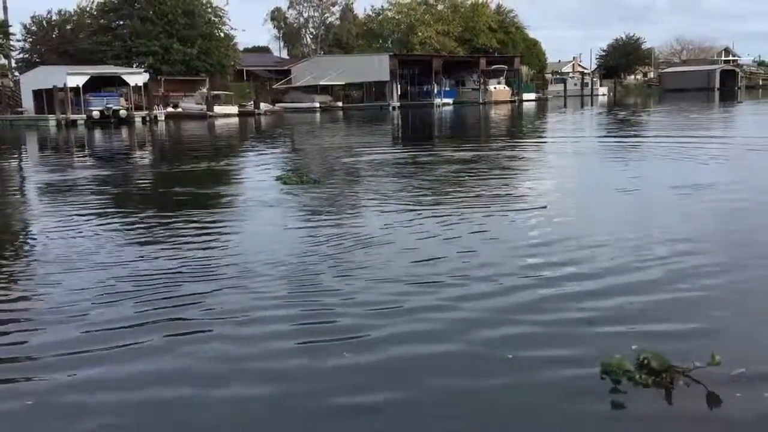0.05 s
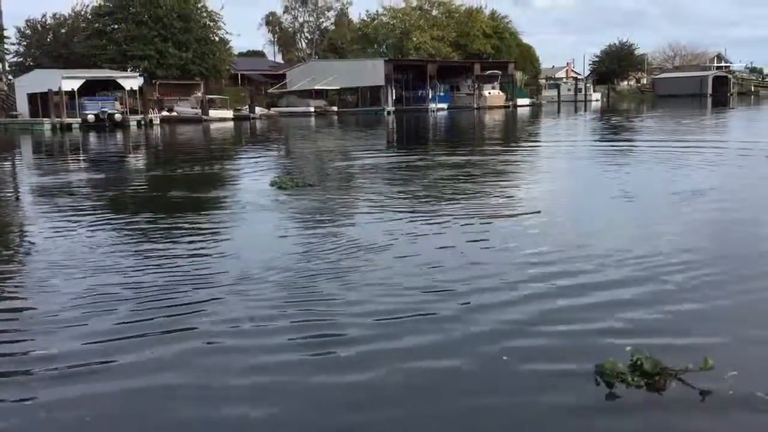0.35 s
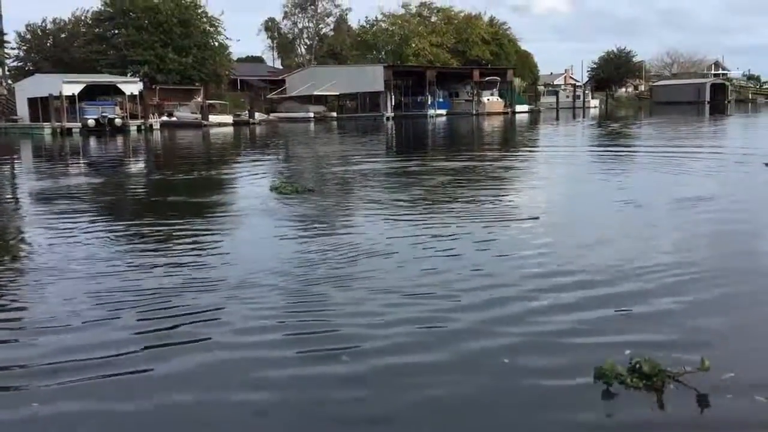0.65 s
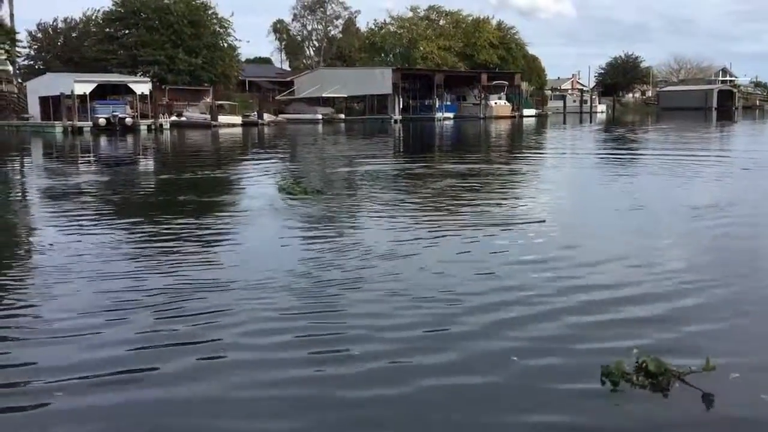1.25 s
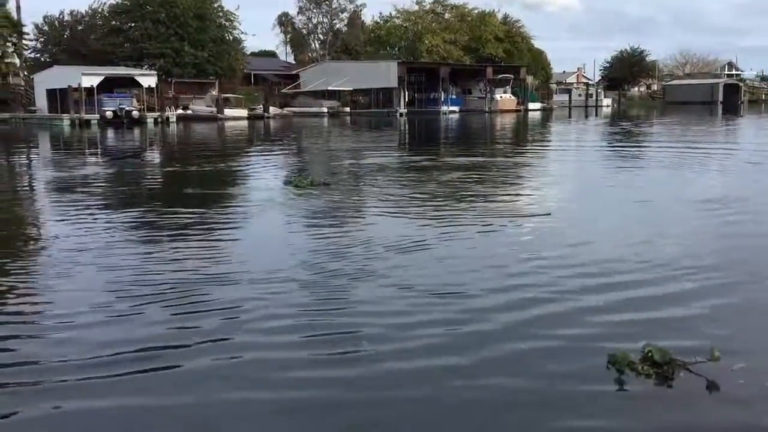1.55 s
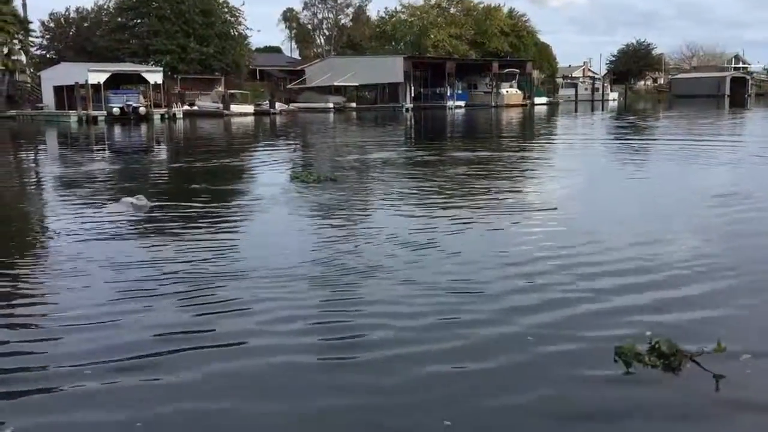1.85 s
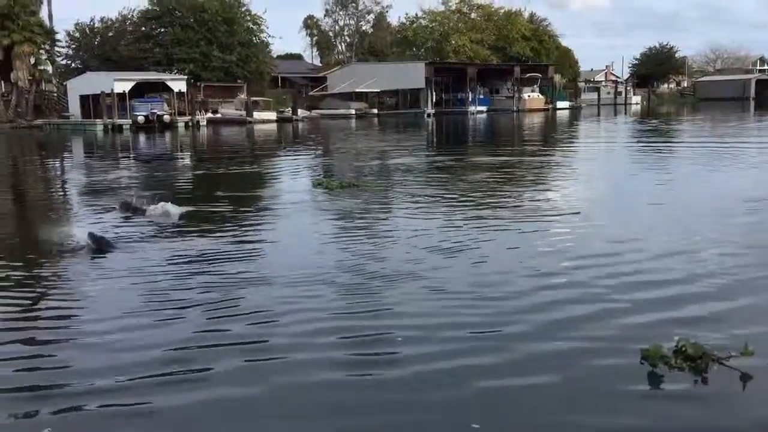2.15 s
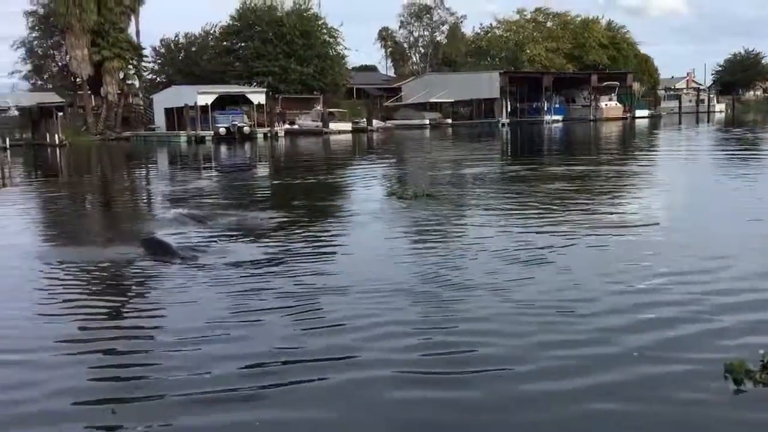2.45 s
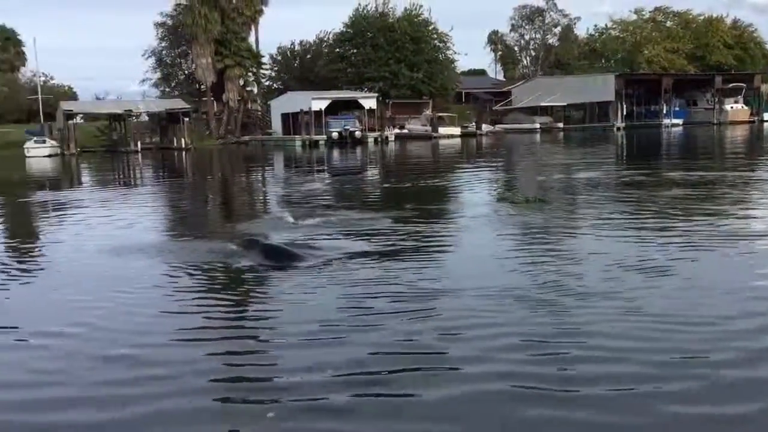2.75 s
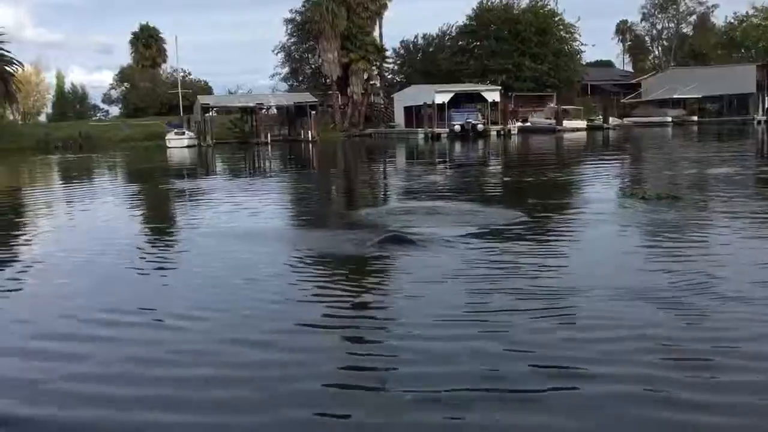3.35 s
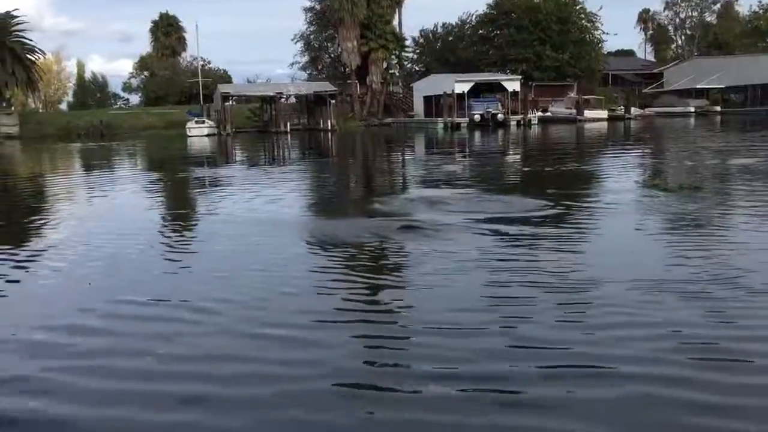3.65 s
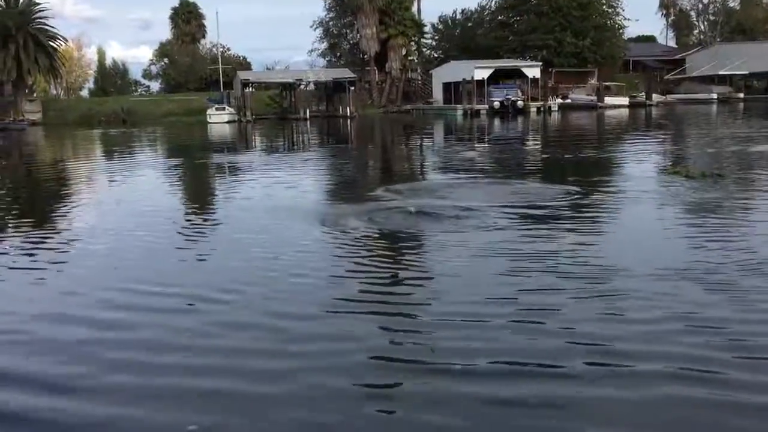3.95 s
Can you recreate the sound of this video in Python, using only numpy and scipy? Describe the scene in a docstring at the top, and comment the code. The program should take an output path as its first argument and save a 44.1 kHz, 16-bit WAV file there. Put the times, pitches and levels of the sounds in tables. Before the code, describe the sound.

Water splashes twice as a sea lion surfaces a few metres out on a quiet waterway, after two faint taps on wood. It rolls under with gurgles and trickles, then ripples plop near the microphone over a low, distant engine rumble.

```python
"""A sea lion surfaces some metres from the microphone on a calm waterway: two quick splashes and a weak
third, made of ringing bubbles and falling spray, then water gurgles and trickles round its body as it
rolls under. Ripples plop close to the bank. Before the splash come two faint wooden knocks and one
chirp of a far bird. Distant engines drone throughout, over a low rumble and a faint hiss."""
import sys
import numpy as np
from scipy import signal
from scipy.fft import rfft, irfft
from scipy.io import wavfile
from scipy.ndimage import map_coordinates

SR = 44100
rng = np.random.default_rng(int(sys.argv[2]) if len(sys.argv) > 2 else 0)


def store_wav(level_fs):
    """Save 16-bit WAV to argv[1]."""
    pcm = np.round(np.clip(np.atleast_2d(level_fs), -1, 1) * 32767)
    wavfile.write(sys.argv[1], SR, pcm.T.astype(np.int16))


N = 176400

# the animal breaking the surface
# (time [s], attack [s], hold [s], fall [dB/s], body level [dB], spray level [dB])
SPLASHES = [(2.046, 0.046, 0.059, 132, -40.5, -52.5), (2.2, .04, 0.05, 70, -41, -52),
            (2.366, 0.036, 0.041, 132, -54, -64.5)]
# churned water, spray and fine bubbles of a splash (frequency [Hz], level [dB])
CHURN_SPECTRUM = [(88, -15), (150, 14), (173, 2.5), (254, -2), (412, -2), (556, 2), (1010, -0.5), (1340, 0),
                  (1550, -3), (1860, -0.5), (2180, -7.5), (3110, -13), (3690, -26), (4500, -18.5),
                  (5850, -49), (9900, -120)]
SPRAY_SPECTRUM = [(2500, -0.5), (3800, -0.5), (4900, -3), (6000, -2), (9000, -5), (10500, -11),
                  (12500, -9.5), (16000, -11)]
FIZZ_SPECTRUM = [(1500, -25), (2000, -2.5), (2400, -6), (2750, -2), (3100, -5), (3700, -19)]
# water running round the body (time [s], gurgle level [dB], trickle level [dB])
WASH_LEVELS = [(2.3, -80, -81.5), (2.42, -69, -53.5), (2.58, -55.5, -55.5), (2.72, -49.5, -51.5),
               (2.84, -50.5, -49.5), (2.95, -53, -51.5), (3.04, -60.5, -56.5), (3.14, -92, -58.5),
               (3.22, -63, -59), (3.33, -101, -64.5), (3.42, -90, -76.5), (3.55, -97, -71.5),
               (3.75, -81.5, -74.5), (4.0, -70, -71.5)]
# big bubbles in the wake and run-off from the back (frequency [Hz], level [dB])
GURGLE_SPECTRUM = [(100, 25), (200, 3), (280, 5), (420, -0.5), (650, 5.5), (950, -0.5), (1600, -8)]
TRICKLE_SPECTRUM = [(400, 1), (750, -0.5), (1150, 2.5), (2000, 1), (2400, -3), (3300, -5), (4300, -7.5),
                    (4900, -7.5), (5600, -6.5), (8000, -16.5), (10500, -19.5), (15000, -25.5)]
# sheets of water dribbling off the back (time [s], level [dB], length [s])
DRIBBLES = [(2.973, -55.5, 0.024), (3.04, -56.5, 0.02), (3.058, -54, 0.034), (3.109, -59, 0.028),
            (3.17, -62, 0.019), (3.196, -50, 0.013), (3.25, -68, 0.04), (3.336, -67, 0.018),
            (3.484, -70, 0.053), (3.53, -57.5, 0.032), (3.967, -65, 0.061)]
# air pockets and drops that ring (time [s], pitch [Hz], peak level [dB], ring [s], glide [octaves/s])
PLOPS = [(.125, 1185, -70.5, 0.074, 4.5), (2.077, 975, -44, 0.18, -1.5), (2.092, 2140, -40.5, 0.03, -8.5),
         (2.114, 187, -36.5, 0.013, 3), (2.141, 737, -44.5, 0.085, 17), (2.167, 1770, -47, 0.056, 15),
         (2.238, 554, -44, 0.066, -3), (2.243, 202, -56, 0.08, 11), (2.253, 1840, -41, 0.11, 0.5),
         (2.294, 775.5, -55, .06, -5.5), (2.406, 1150, -39.5, 0.023, 2), (2.406, 290, -45.5, .04, -8),
         (2.52, 3330, -48, 0.0095, 11), (2.564, 3080, -49, 0.011, 11), (2.717, 630, -50, 0.078, 7),
         (2.74, 455, -47, 0.082, 2.5), (2.811, 233.4, -39.5, 0.02, -2), (3.369, 3210, -58.5, 0.02, 44),
         (3.5012, 3540, -48, 0.0039, -14), (3.504, 2214, -55, 0.012, 7), (3.51, 2650, -53, 0.013, 34),
         (3.514, 1170, -52.5, 0.037, 4.5), (3.533, 748, -45.5, 0.043, 29.5), (3.549, 1057, -46, 0.019, 19),
         (3.561, 2860, -53, 0.0055, 71), (3.645, 3920, -66.5, 0.023, 3), (3.657, 1080, -61, 0.066, 5),
         (3.98, 2800, -47.5, 0.0067, -2), (3.987, 4090, -60, 0.017, 2)]
# sharp slaps of water (time [s], level [dB], centre [Hz], width [Hz], decay [s])
SLAPS = [(2.253, -48, 2520, 2920, 0.018), (2.178, -44, 6140, 3000, 0.0037), (2.341, -53, 5840, 2000, 0.008),
         (2.415, -43.5, 4370, 2420, 0.0046), (2.861, -37.5, 1180, 4050, 0.01),
         (2.865, -43, 5553, 2500, 0.0035), (3.081, -50, 4940, 8800, 0.0029),
         (3.16, -35.5, 4660, 3860, 0.001), (3.205, -49.5, 4700, 3800, 0.0076),
         (3.259, -53, 4740, 2930, 0.0031), (3.507, -58, 6100, 5000, 0.0086),
         (3.5297, -34.5, 2820, 1600, 0.0017), (3.534, -42.5, 6450, 11000, 0.0039),
         (3.551, -57, 6000, 9000, .006), (3.847, -56.5, 3000, 1500, 0.0018),
         (3.961, -43.5, 3800, 1766, 0.0022), (3.987, -61, 2950, 3960, 0.005),
         (3.988, -52.5, 12700, 4000, 0.0028)]
# light taps on wood (time [s], level [dB])
KNOCKS = [(.489, -56.5), (.581, -65.5)]
# resonances of the wood (frequency [Hz], relative level [dB], time to fall 60 dB [s])
WOOD_MODES = [(1510, -8.5, 0.064), (1940, -7, 0.022), (2240, 1, 0.017), (2610, -5.5, 0.028),
              (4600, -14, 0.016)]
# two far engines (time [s], first pitch [Hz], first level [dB], second pitch [Hz], second level [dB])
ENGINES = [(0, 45.44, -70, 59.67, -68.5), (.15, 45.08, -53.5, 59.6, -60.5), (.8, 45.66, -48, 61.23, -66.5),
           (1.35, 44.46, -54, 61.62, -78), (1.9, 45.14, -52.5, 63.17, -61.5),
           (2.5, 44.27, -51.5, 62.46, -59), (3.15, 41.16, -53, 64.4, -79), (3.6, 39.47, -56.5, 65.2, -65.5),
           (4.0, 38.67, -56, 65.9, -56)]
# harmonics of each engine (multiple of its pitch, relative level [dB])
FIRST_HARMONICS = [(1, -16.5), (2, -5), (3, -19), (4, -24)]
SECOND_HARMONICS = [(2, -11), (4, -2), (5, -18), (6, -23)]
# low rumble and open-air hiss of the waterway (frequency [Hz], level [dB])
RUMBLE_SPECTRUM = [(22, -56), (30, -31), (38, -12.5), (55, 3.5), (80, -6), (120, -1.5), (170, -21),
                   (270, -16), (380, -32), (600, -74)]
AIR_SPECTRUM = [(250, -9), (400, -7), (600, -7), (1000, -15), (2000, -15.5), (4000, -17.5), (4900, -20),
                (6000, -18.5), (9000, -21.5), (10400, -25), (12000, -22.5), (16000, -25.5)]


def splashes():
    """The sea lion, some metres out: each splash throws spray and fizz, then churns up larger bubbles."""
    fizz_db, churn_lag_s = -7, 0.0044  # both relative to the splash
    churn = bubbling(200, 4500, cycles=28, scatter_db=10, count=7000)
    fine = bubbling(1800, 3500, cycles=45, scatter_db=8, count=2000)
    impacts = crackle(scatter_db=7, count=10000)
    body = colour(churn + impacts, CHURN_SPECTRUM)
    spray = colour(crackle(scatter_db=7, count=10000), SPRAY_SPECTRUM)
    fizz = colour(fine, FIZZ_SPECTRUM)
    out = np.zeros(N)
    for start, attack, hold, fall, db, spray_db in SPLASHES:
        age = clock() - start
        out += undb(spray_db) * spray * surge(age, attack, hold, fall)
        out += undb(db + fizz_db) * fizz * surge(age, attack, hold=0, fall_db_per_s=130)
        out += undb(db) * body * surge(age - churn_lag_s, attack, hold, fall)
    return out


def surge(age, attack, hold, fall_db_per_s):
    """The envelope of a splash: it swells, holds, then falls steadily."""
    swell = np.clip(age / attack, 0, 1) ** 2.4
    return swell * undb(-fall_db_per_s * np.maximum(age - attack - hold, 0))


def wash():
    """Big bubbles gurgle in the wake while small ones and droplets trickle off the back in spurts."""
    gurgle_db, trickle_db = curves(WASH_LEVELS)
    big = bubbling(170, 1200, cycles=12, scatter_db=5, count=4000)
    small = bubbling(600, 4200, cycles=22, scatter_db=10, count=6000)
    patter = crackle(scatter_db=12, count=5000)
    trickle = colour(small + 1.4 * patter, TRICKLE_SPECTRUM)
    flow = undb(trickle_db)
    for start, db, length in DRIBBLES:
        flow += undb(db) * np.sin(np.pi * np.clip((clock() - start) / length, 0, 1))
    return undb(gurgle_db) * colour(big, GURGLE_SPECTRUM) + flow * trickle


def bubble(hz, ring_s, octaves_per_s):
    """Trapped air rings as a damped sine that swells within a few cycles and glides in pitch."""
    attack_cycles, glide_share = 1.3, 0.45
    t = np.arange(int(ring_s * SR) + 2) / SR
    swell = 1 - np.exp(-t * hz / attack_cycles)
    envelope = swell * np.exp(-np.log(100) * (t / ring_s) ** 1.8)
    pitch = hz * 2 ** (octaves_per_s * np.minimum(t, glide_share * ring_s))
    return envelope / envelope.max() * np.sin(2 * np.pi * np.cumsum(pitch) / SR)


def bubbling(low_hz, high_hz, cycles, scatter_db, count):
    """A cloud of bubbles, many small and few large, each rising in pitch as it nears the surface."""
    out = np.zeros(N)
    for when, pitch, strength, sustain, glide in rng.random((count, 5)):
        hz = low_hz + (high_hz - low_hz) * pitch
        ring_s = cycles * (.5 + sustain) / hz
        gain = np.sqrt(hz) * undb(scatter_db * strength ** 2)  # the root keeps power per Hz even
        add(out, when * N / SR, gain * bubble(hz, ring_s, 0.17 * glide / ring_s))
    return unit(out)


def crackle(scatter_db, count, decay_s=.0012):
    """Droplets hitting the surface: tiny noise bursts of uneven strength."""
    hits = np.zeros(N)
    when, size = rng.random((count, 2)).T
    np.add.at(hits, (when * N).astype(int), undb(scatter_db * size ** 4) ** 2)
    power = signal.lfilter([1], [1, -np.exp(-1 / (decay_s * SR))], hits)
    return unit(np.sqrt(power) * rng.standard_normal(N))


def plops():
    """Single air pockets and drops ring out above the rest of the water."""
    out = np.zeros(N)
    for start, hz, db, ring_s, glide in PLOPS:
        add(out, start, undb(db) * bubble(hz, ring_s, glide))
    return out


def slaps(attack_s=.0012):
    """Water slapping on water: short cracks, each in its own band."""
    out, t = np.zeros(N), np.arange(4096) / SR
    for start, db, hz, width, decay in SLAPS:
        low = np.hypot(hz, width / 2) - width / 2
        band = signal.butter(2, [low, min(low + width, SR / 2 - 1)], "bandpass", fs=SR, output="sos")
        burst = unit(signal.sosfilt(band, rng.standard_normal(len(t))))
        envelope = (1 - np.exp(-t / attack_s)) * np.exp(-t / decay)
        add(out, start, undb(db) * burst * envelope)
    return out


def knocks():
    """Something wooden taps twice, faint at the microphone, and rings in a few short modes."""
    rattle_s, rattle_db = 0.0043, -2  # a second contact just after each tap
    out, t = np.zeros(N), np.arange(4096) / SR
    ring = sum(undb(db - 60 * t / t60) * np.sin(2 * np.pi * hz * t) for hz, db, t60 in WOOD_MODES)
    for start, db in KNOCKS:
        add(out, start, undb(db) * ring)
        add(out, start + rattle_s * (1 + .1 * rng.standard_normal()), undb(db + rattle_db) * ring)
    return out


def bird(start_s=0.817, length_s=0.12, level_db=-75.5):
    """A bird far off: one thin whistle that slides up and levels out."""
    top_hz, rise_hz, rise_s = 2610, 408, 0.0232
    out, t = np.zeros(N), np.arange(int(length_s * SR)) / SR
    hz = top_hz - rise_hz * np.exp(-t / rise_s) + 30 * wander(90)[:len(t)]
    whistle = np.sqrt(2) * np.sin(2 * np.pi * np.cumsum(hz) / SR)
    add(out, start_s, undb(level_db) * np.sin(np.pi * t / length_s) * whistle)
    return out


def bank_echo(sound, t60_s=.3, level_db=-13):
    """Docks and banks scatter a weak, short tail back to the microphone."""
    t = clock()
    scatter = colour(rng.standard_normal(N), [(150, -19.5), (2000, 17), (12000, 15.5)])
    tail = scatter * undb(-60 * t / t60_s) * (1 - np.exp(-t / 0.005))
    return undb(level_db) * signal.fftconvolve(sound, tail / np.sqrt(np.sum(tail ** 2)))[:N]


def drone(hz, harmonics, waver_db=1.2):
    """Harmonics of a far engine, each wavering on its way over the water."""
    phase = 2 * np.pi * np.cumsum(hz * (1 + 0.0048 * wander(9))) / SR
    out = np.zeros(N)
    for multiple, db in harmonics:
        amplitude = np.sqrt(2) * undb(db + waver_db * wander(11))
        out += amplitude * np.sin(round(multiple) * phase + 2 * np.pi * rng.random())
    return out


def engines():
    """Two engines in the distance, drifting in pitch and level."""
    first_hz, first_db, second_hz, second_db = curves(ENGINES)
    first = undb(first_db) * drone(first_hz, FIRST_HARMONICS)
    return first + undb(second_db) * drone(second_hz, SECOND_HARMONICS)


def ambience(rumble_db=-56.5, hiss_db=-75):
    """The bed of the place: an unsteady low rumble and a faint even hiss."""
    rumble = undb(rumble_db + 2.14 * wander(10)) * colour(rng.standard_normal(N), RUMBLE_SPECTRUM)
    return rumble + undb(hiss_db) * colour(rng.standard_normal(N), AIR_SPECTRUM)


def undb(db):
    """Decibels to gain."""
    return 10 ** (np.asarray(db) / 20)


def unit(x):
    """Scale to rms 1."""
    return x / np.sqrt(np.mean(x ** 2) + 1e-30)


def clock():
    """Time of every sample in seconds."""
    return np.arange(N) / SR


def curves(table):
    """Each column after the time column, joined by straight lines."""
    times, *columns = np.array(table).T
    return [np.interp(clock(), times, column) for column in columns]


def colour(x, points):
    """Filter by (frequency [Hz], level [dB]) points, rolling off past both ends; scale to rms 1."""
    hz, db = np.array(points).T
    f = np.maximum(np.arange(N // 2 + 1) * SR / N, 1)
    gain = undb(np.interp(np.log(f), np.log(hz), db))
    roll_off = np.minimum(f / hz[0], 1) ** 2 * np.minimum(hz[-1] / f, 1) ** 2
    return unit(irfft(rfft(x) * gain * roll_off, N))


def wander(rate_hz):
    """Smooth random drift with a spread near 1."""
    return map_coordinates(rng.standard_normal(1024), [clock() * rate_hz], order=3, mode="wrap")


def add(out, start, sound):
    """Mix a short sound in at a time in seconds."""
    i = int(np.clip(start * SR, 0, N - 1))
    out[i:i + len(sound)] += sound[:N - i]


def scene():
    """One microphone by the water: splashing echoes off the banks; plops, slaps and knocks less so."""
    broad = splashes() + wash() + bird()
    crisp = plops() + slaps() + knocks()
    echo = bank_echo(broad + undb(-8) * crisp)
    return (broad + crisp + echo + engines() + ambience())[None]


def record(dry, top_hz=15750):
    """The recorder cuts the top of the treble."""
    return signal.sosfilt(signal.ellip(10, .2, 70, top_hz, fs=SR, output="sos"), dry)


dry = scene()
out = record(dry)
store_wav(out)
```